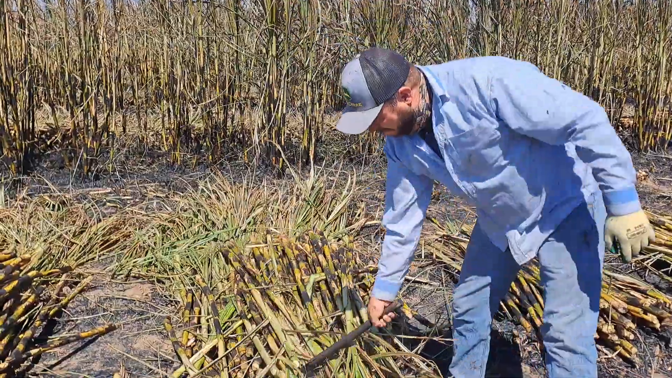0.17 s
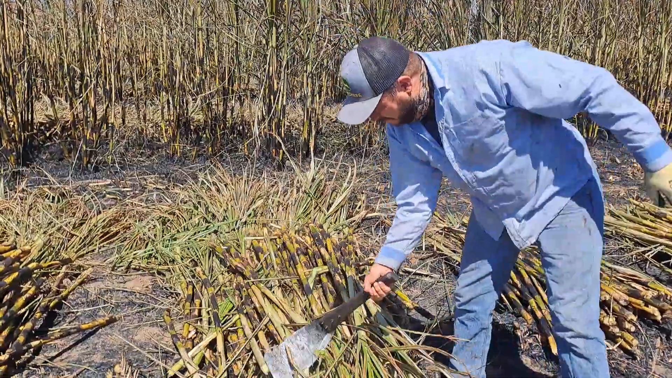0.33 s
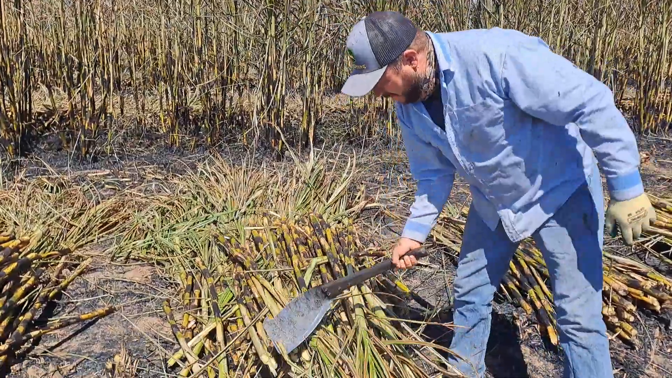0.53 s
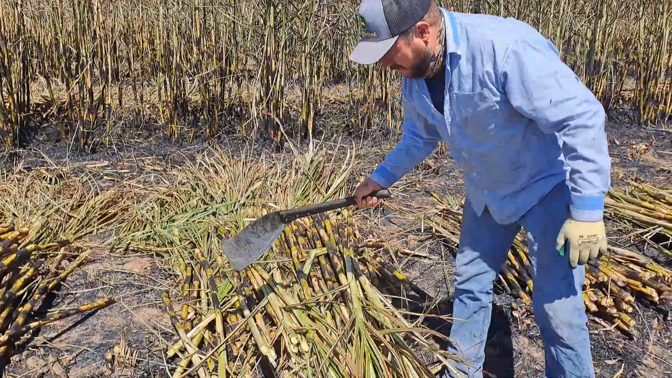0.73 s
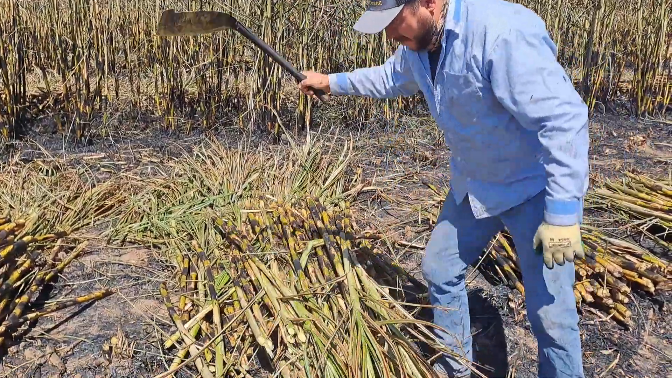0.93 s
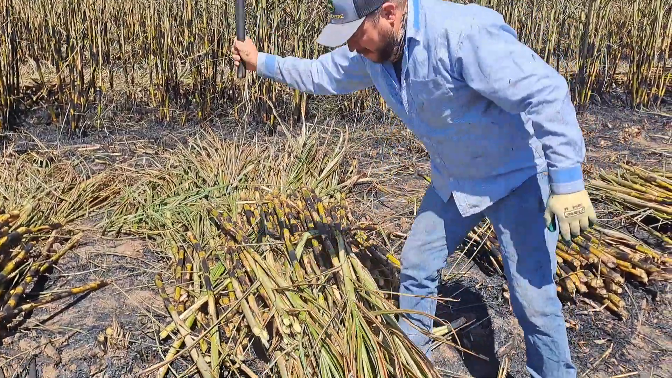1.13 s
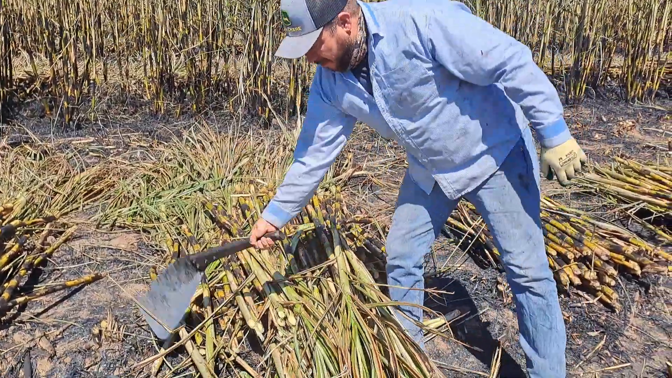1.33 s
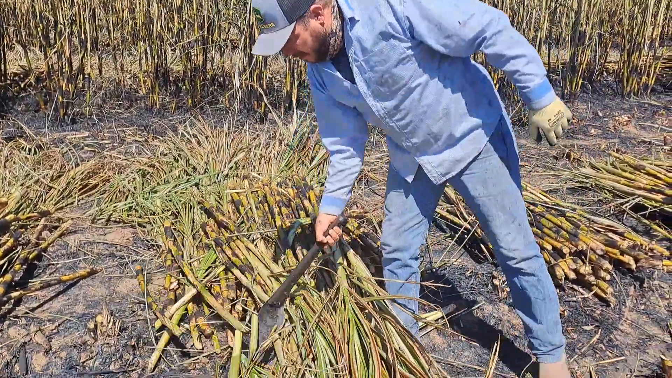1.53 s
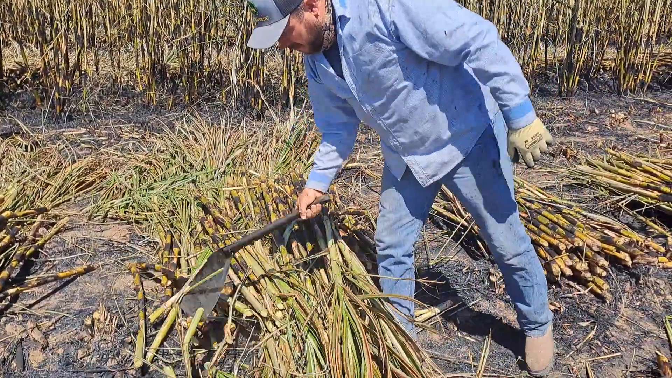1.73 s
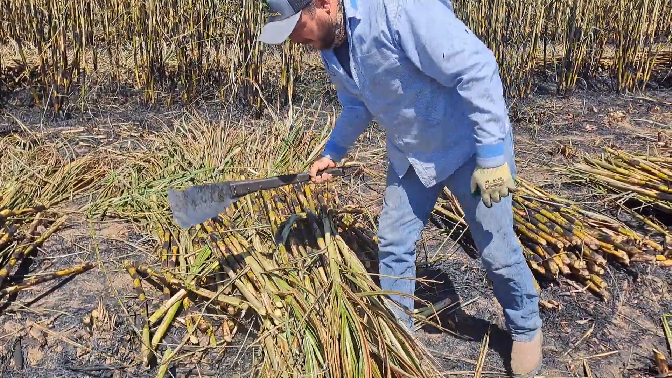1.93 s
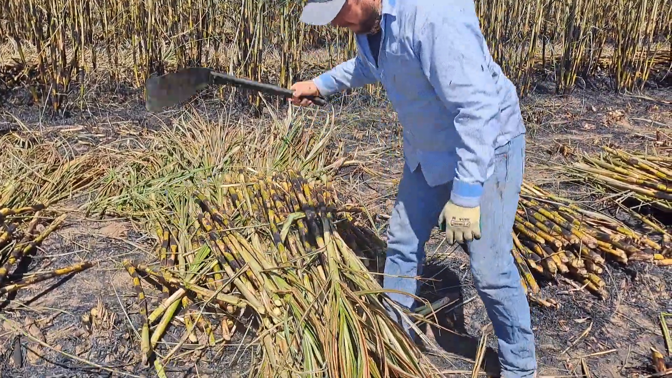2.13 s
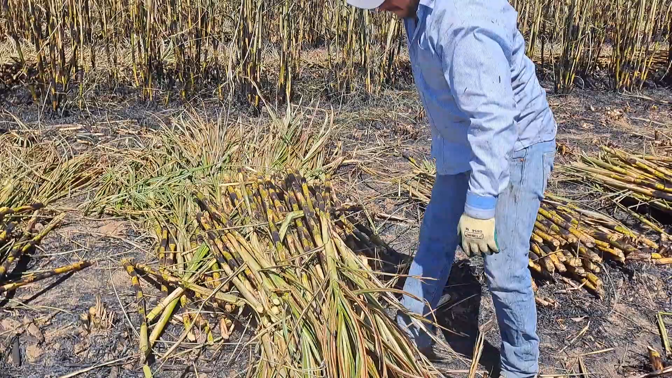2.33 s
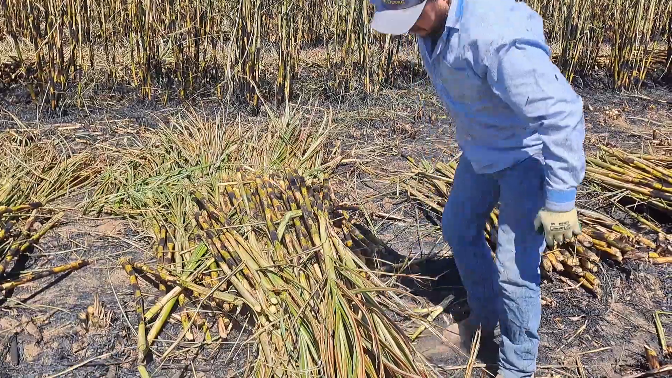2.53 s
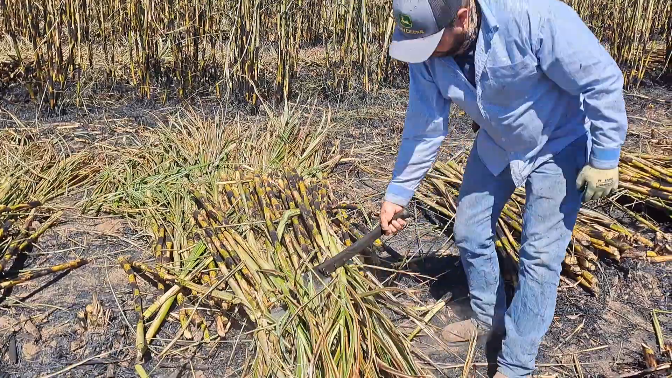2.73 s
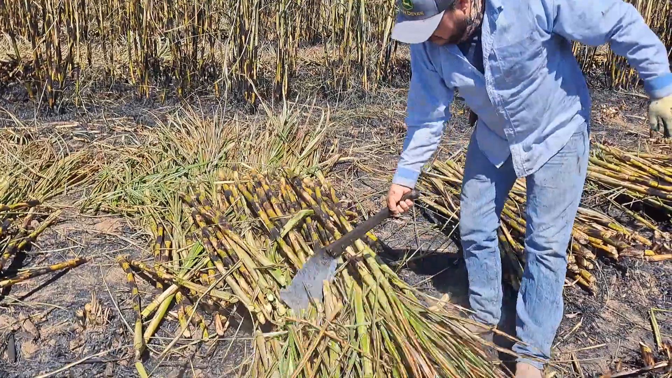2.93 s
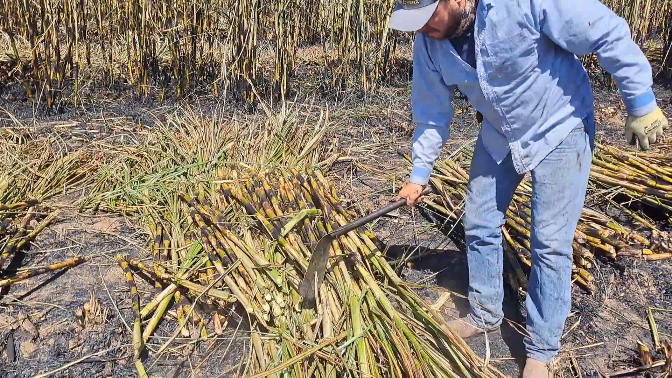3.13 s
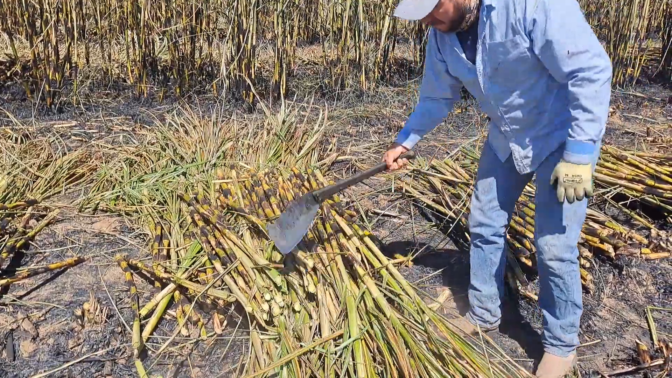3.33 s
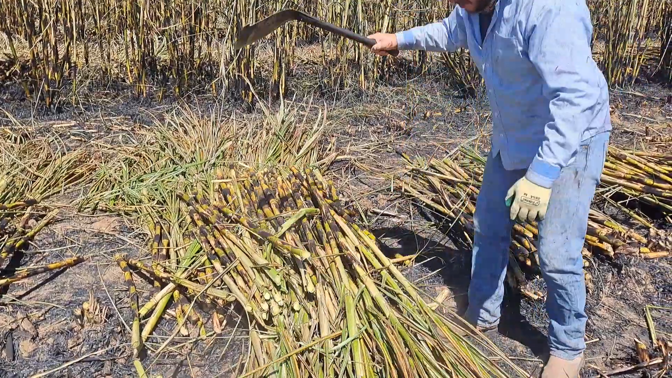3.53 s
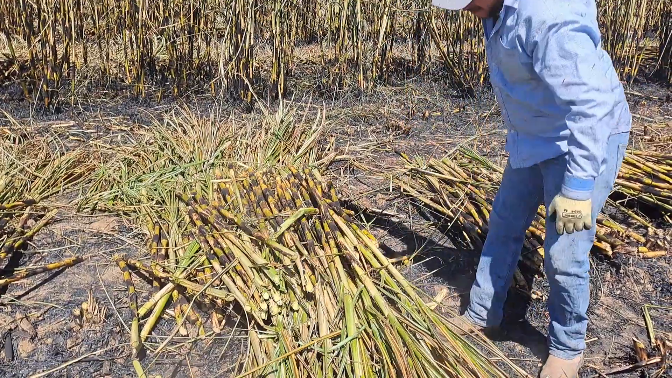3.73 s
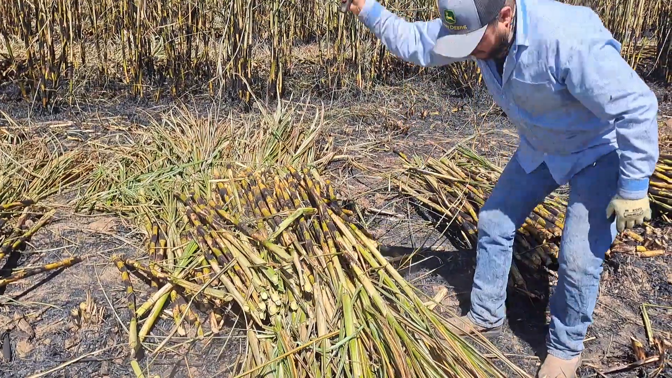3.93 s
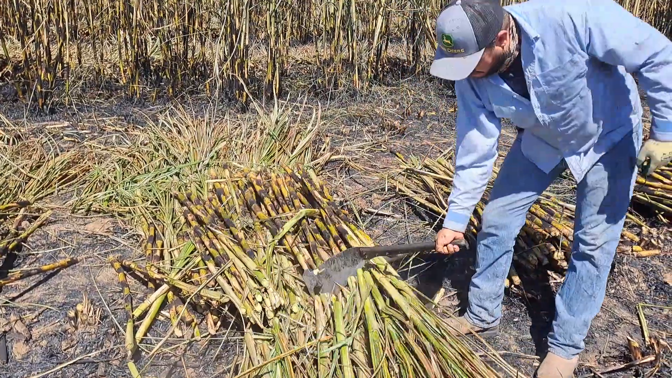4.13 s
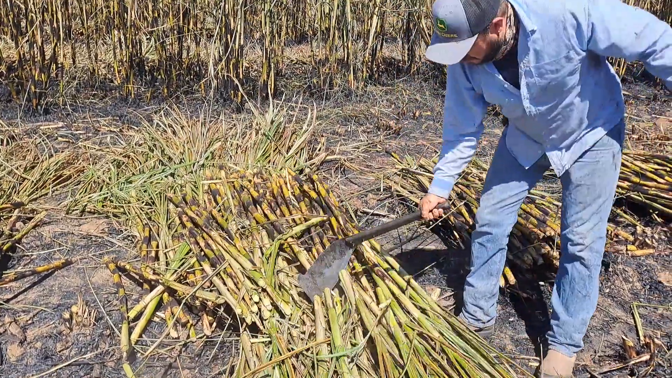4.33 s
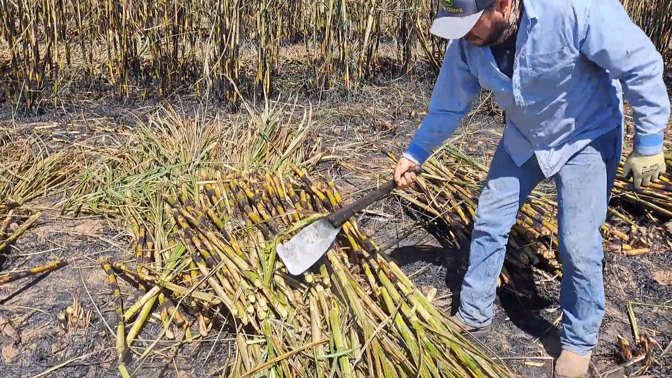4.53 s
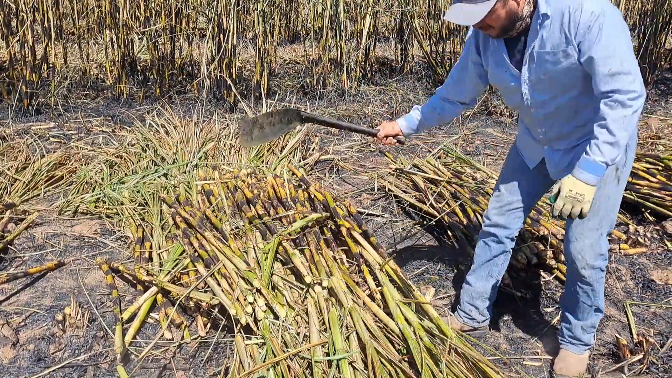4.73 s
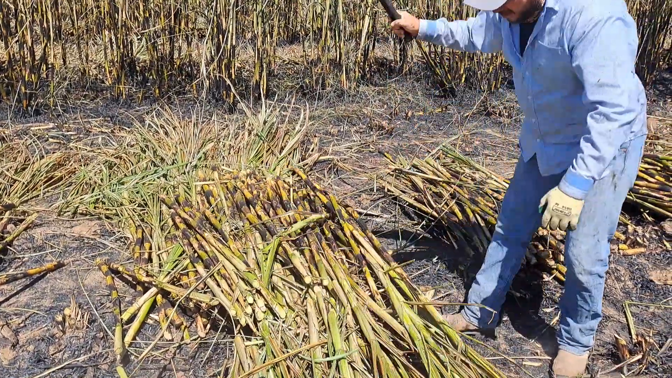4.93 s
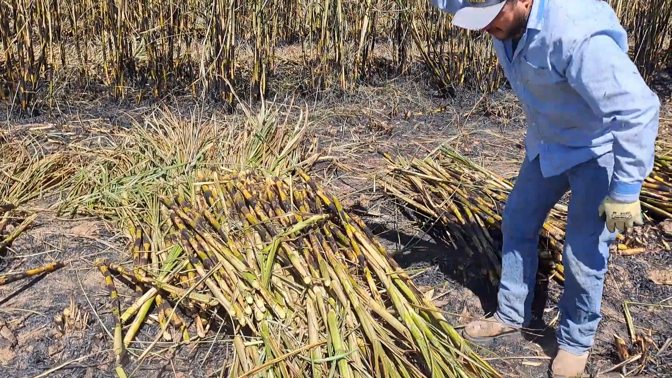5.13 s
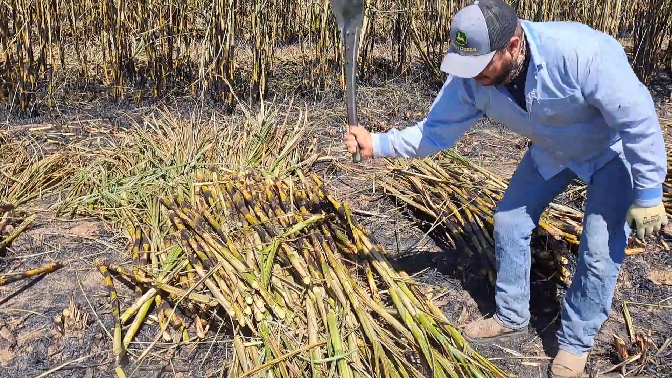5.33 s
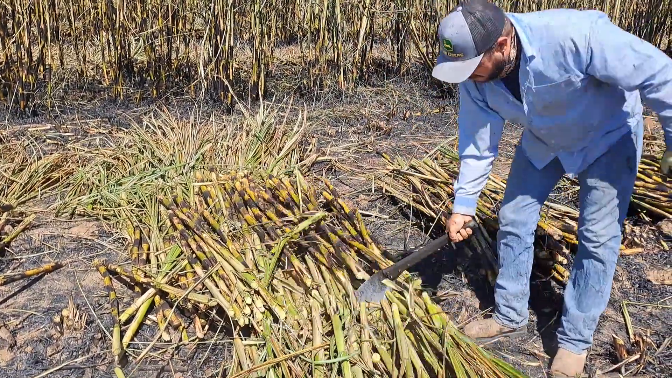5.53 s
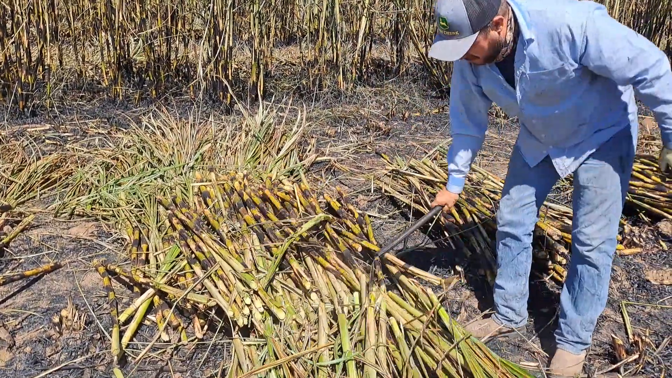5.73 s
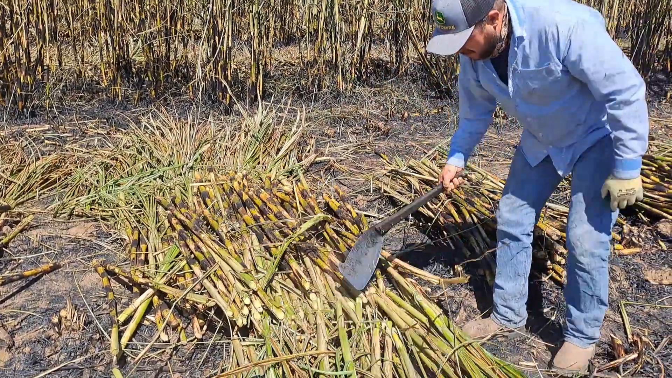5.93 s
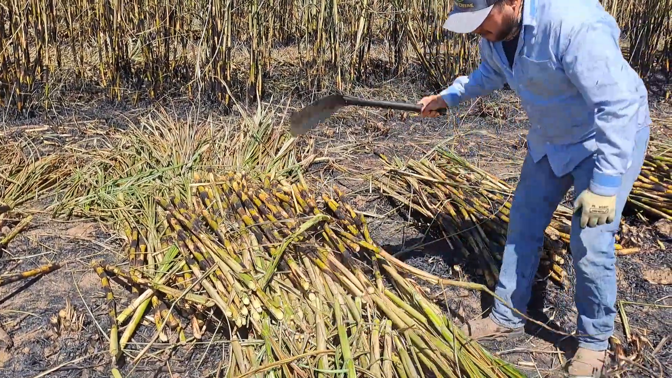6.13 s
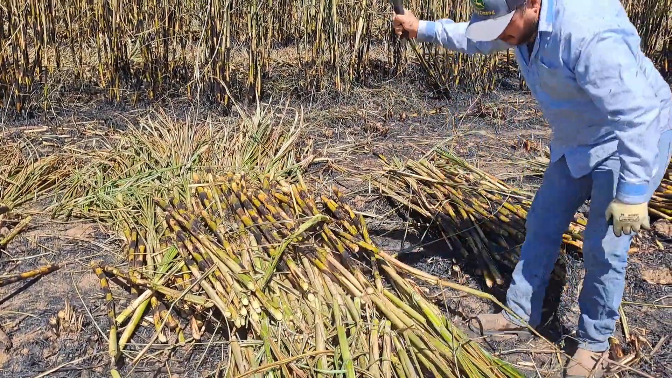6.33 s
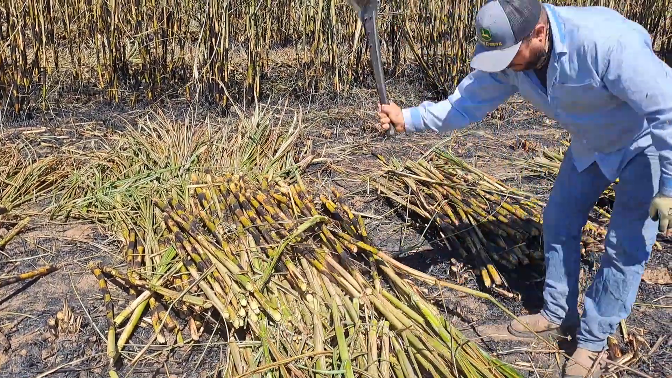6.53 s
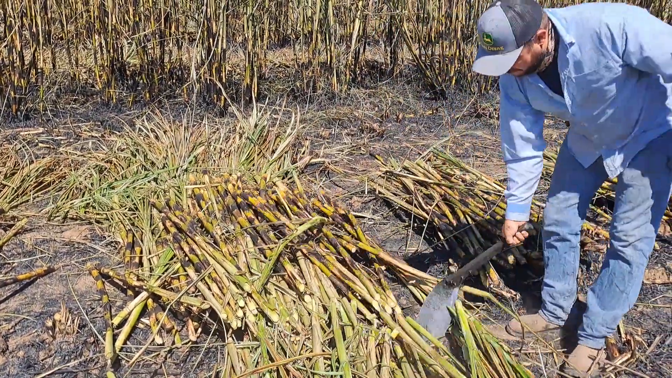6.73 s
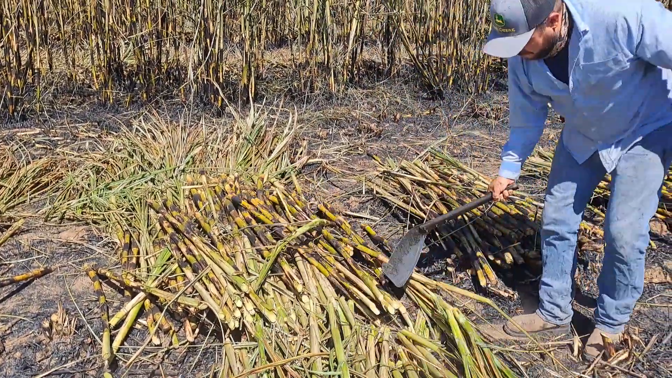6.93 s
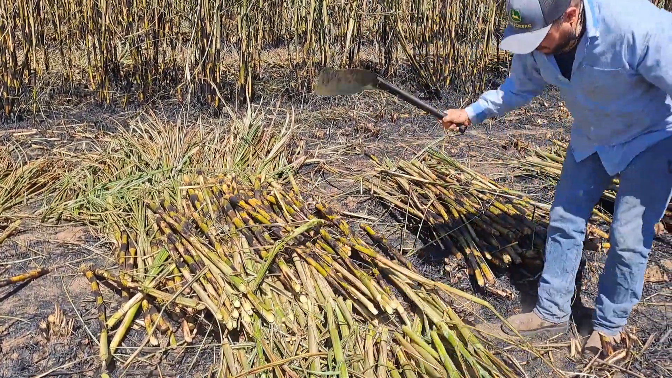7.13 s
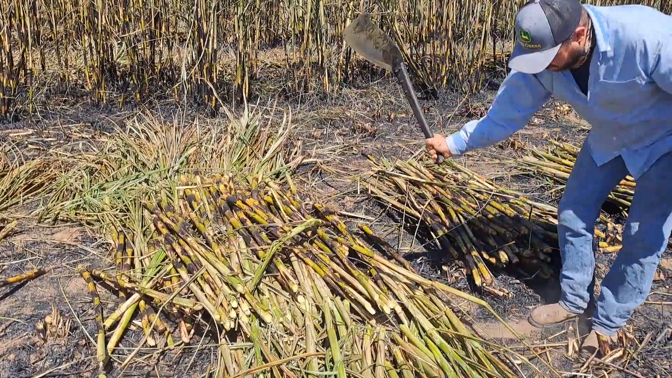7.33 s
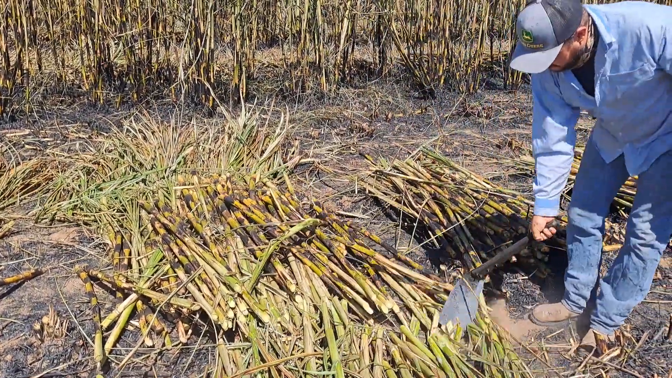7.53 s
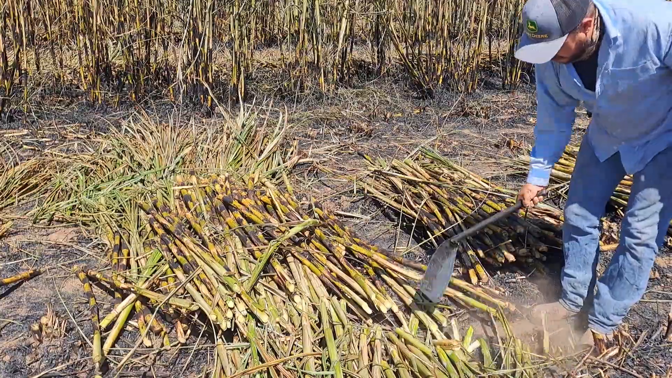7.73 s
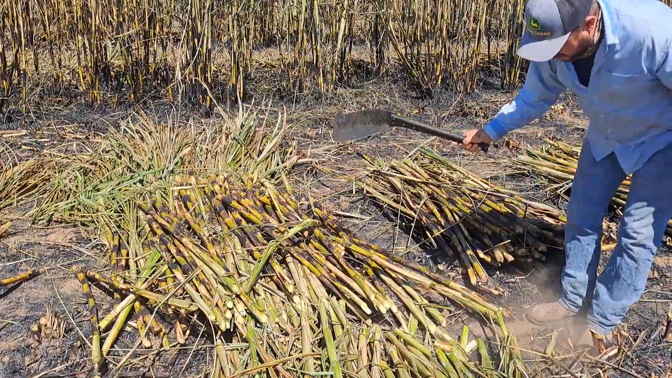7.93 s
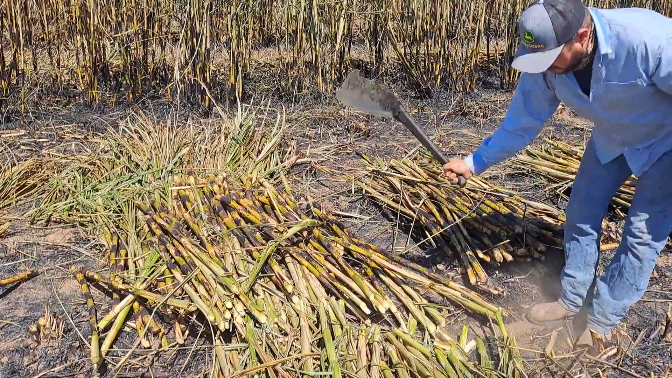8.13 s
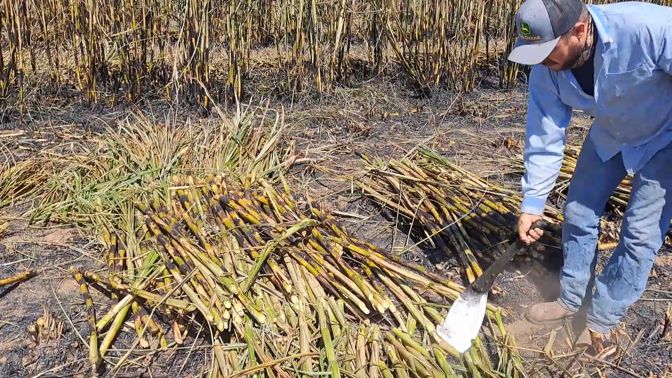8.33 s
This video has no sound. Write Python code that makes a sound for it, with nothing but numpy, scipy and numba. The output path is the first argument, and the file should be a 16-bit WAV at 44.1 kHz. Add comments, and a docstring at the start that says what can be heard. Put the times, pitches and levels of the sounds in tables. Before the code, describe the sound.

A heavy blade chops piled sugarcane in seven crunchy strokes, each followed by dry leafy rustling, over a faint distant engine drone and later wind buffeting.

```python
"""A far engine drones under a field's hiss (coloured noise); leaves brush and boots scuff stubble (random clicks).
From 0.18 s a heavy knife chops piled sugarcane in seven strokes: a rush of air, a burst of snapping fibres,
a ringing knock and a thud. After each, a hiss with tiny rings is the pile rustling and settling; stalks snap
and soft thumps land on soil between strokes. At 3.9 s the blade sings faintly as three fading sines.
From 4.7 s deep noise and single low thumps are wind buffeting the microphone."""
import sys
import numpy as np
from scipy import signal
from scipy.fft import rfft, irfft
from scipy.io import wavfile
from scipy.ndimage import uniform_filter1d
from numba import njit

SR = 44100
rng = np.random.default_rng(int(sys.argv[2]) if len(sys.argv) > 2 else 0)


def transcribe(u):
    """Save the signal u as a 16-bit wav file named by the first command-line argument.

    u: samples, shape (n,) or (channels, n), limited to [-1, 1]; the rate is SR.
    q: integer samples, one column per channel.
    """
    v = np.clip(np.atleast_2d(u).T, -1, 1)
    q = np.round(v * 32767).astype(np.int16)
    wavfile.write(sys.argv[1], SR, q)


N = 369116
TIME = np.arange(N) / SR
HIT_SIZE = 16384  # samples set aside for one short sound


def undb(db):
    """Turn decibels into gain."""
    return 10 ** (np.asarray(db) / 20)


def unit(x):
    """Scale to an average (rms) strength of 1."""
    return x / np.sqrt(np.mean(x ** 2) + 1e-18)


def colour(x, points, size=4096):
    """Shape the spectrum through (frequency [Hz], level [dB]) points, without sounding ahead of time."""
    hz, db = np.transpose(points)
    log_hz = np.log(np.fft.rfftfreq(size, 1 / SR) + 1)
    log_gain = np.log(undb(np.interp(log_hz, np.log(hz), db)))
    # folding the cepstrum forward makes the filter minimum phase
    cepstrum = irfft(log_gain)
    cepstrum[1:size // 2] *= 2
    cepstrum[size // 2 + 1:] = 0
    response = irfft(np.exp(rfft(cepstrum)))
    return signal.fftconvolve(x, response[None], axes=1)[:, :x.shape[1]]


def resonate(x, hz, width_hz):
    """Ring at one pitch: a two-pole resonance with gain 1 at its centre."""
    b, a = signal.iirpeak(hz, hz / width_hz, fs=SR)
    return signal.lfilter(b, a, x)


def walk(rate):
    """Drift smoothly between random values, with a spread a little below 1."""
    hold = int(SR / rate)
    steps = np.repeat(rng.standard_normal(N // hold + 1), hold)
    return uniform_filter1d(steps, hold)[:N]


def clicks(rate, scatter_db, lag_ms, spread_ms, size=N):
    """Random clicks of uneven strength; each has its own direction, so its own lag at the left port."""
    chance = np.clip(rate / SR, 1e-4, 1)
    right = (rng.random(size) < chance) / np.sqrt(chance) * rng.choice([-1, 1], size)
    right = right * undb(scatter_db * np.clip(rng.standard_normal(size), -3, 3))
    lag = np.rint((lag_ms + spread_ms * rng.standard_normal(size)) * SR / 1000).astype(int)
    left = np.bincount((np.arange(size) + lag) % size, right, size)
    return unit(np.array([left, right]))


def burst(length, rate, scatter_db, tail_db, tail_s, lag_ms=0., spread_ms=0.097, entry=1):
    """Clicks that swell and stop within a contact, over a tail that builds up and trails off."""
    age = TIME[:HIT_SIZE]
    progress = np.minimum(age / length, 1)
    contact = (4 * progress * (1 - progress)) ** np.clip(entry, .05, 2)
    tail = undb(tail_db) * progress * np.exp(-age / tail_s)
    return clicks(rate, scatter_db, lag_ms, spread_ms, size=HIT_SIZE) * (contact + tail)


def add(out, s, sound, db, length):
    """Mix in a sound at time s with the energy of level db held for the given length."""
    start = max(int(s * SR), 0)
    gain = undb(db) * np.sqrt(length * SR / HIT_SIZE)
    part = (unit(sound) * gain)[:, :N - start]
    out[:, start:start + part.shape[1]] += part


@njit
def ring(start, lag, hz, decay, size):
    """Sum of short damped sines; each reaches the left port lag samples after the right."""
    out = np.zeros((2, N))
    for k in range(len(start)):
        pole = np.exp(2j * np.pi * hz[k] / SR - 1 / (decay[k] * SR))
        z = size[k] / np.sqrt(decay[k]) + 0j
        for i in range(start[k], min(start[k] + int(6 * decay[k] * SR), N)):
            z *= pole  # one sample of turning and fading
            out[1, i] += z.imag
            if 0 <= i + lag[k] < N:
                out[0, i + lag[k]] += z.imag
    return out


def grains(rate, low_hz, high_hz, typical_ring_s, scatter_db, lag_ms, spread_ms):
    """Small pieces flick at random, each with its own pitch, ring, strength and direction."""
    chance = np.clip(rate / SR, 1e-4, 1)
    start = np.flatnonzero(rng.random(N) < chance)
    strength, damping, direction = rng.standard_normal((N, 3))[start].T
    pitch, sign = rng.random((N, 2))[start].T
    hz = low_hz + (high_hz - low_hz) * pitch
    lag = np.rint((lag_ms + spread_ms * direction) * SR / 1000).astype(np.int64)
    size = np.sign(sign - .5) * undb(scatter_db * np.clip(strength, -3, 3))
    decay = typical_ring_s * np.exp(.5 * np.clip(damping, -2, 2))
    return ring(start, lag, hz, decay, size)


# far engine and standing cane, relative spectrum: (frequency [Hz], level [dB])
FIELD_SPECTRUM = [(20, -13.5), (42, 2), (62, 15), (85, 3), (130, -8), (250, -9.5), (500, -33), (900, -12),
                  (1950, -15.5), (2300, -6), (2600, -18.5), (3200, -21.5), (6000, -19.5), (16000, -27)]


def field():
    """A far engine drones as a low band of noise under the hiss of the standing cane."""
    air = colour(clicks(46000, scatter_db=-2.0, lag_ms=0., spread_ms=0.39), FIELD_SPECTRUM)
    return unit(air) * undb(-56 + .5 * walk(9))


def flutter(x, depth_db=1.0, rate=38):
    """Patches of leaves slip on their own, so each of four pitch bands flickers separately."""
    out, rest = 0, x
    for hz in (2500, 5000, 9000):
        lowpass = signal.butter(2, hz, fs=SR, output="sos")
        low = signal.sosfiltfilt(lowpass, rest)
        out = out + low * undb(depth_db * walk(rate))
        rest = rest - low
    return out + rest * undb(depth_db * walk(rate))


# Leaf and stalk levels below are before their trims and flicker.
# the shaken pile after each stroke: (time [s], first shake level [dB], sliding level [dB], sliding fade [dB/s],
# time until the blade is lifted clear [s], stalks against leaves [dB])
PILE_SHAKES = [(0.189, -23.5, -21, 49, 0.55, -10), (1.43, -43, -24, 27, 0.48, -10.5),
               (2.801, -17.5, -25, 26.5, 0.69, -11.5), (4.137, -21.5, -27.5, 13.5, 0.79, -12),
               (5.477, -20, -26, 14.5, 0.47, -11.5), (6.71, -25, -25, 33.5, 0.71, -11),
               (7.523, -42, -29.5, 46.5, 0.51, -7.5)]
# leaves brushed between strokes: (time of peak [s], level [dB], swell [s], fade [s])
LEAF_BRUSHES = [(0.03, -52.5, 0.11, 0.056), (1.1, -49, 0.054, 0.098), (1.3, -49, 0.078, 0.14),
                (1.7, -34.5, 0.012, 0.017), (1.84, -34.5, 0.039, 0.048), (2.118, -50, 0.0055, 0.016),
                (2.205, -54, 0.008, .02), (2.34, -48.5, 0.03, 0.094), (2.5, -46.5, 0.049, 0.085),
                (2.668, -53, 0.017, .04), (3.25, -38, 0.034, 0.06), (3.43, -44, 0.029, 0.062),
                (3.86, -53, .015, 0.024), (4.565, -40, 0.023, 0.011), (4.75, -33.5, 0.014, 0.066),
                (5.4, -41.5, 0.19, 0.24), (6.63, -52, 0.093, 0.068), (7.31, -42, 0.039, 0.081),
                (8.217, -44.5, 0.0087, 0.038)]
# stalks stirred between strokes, some by shifting feet: (time of peak [s], level [dB], half length [s])
STALK_STIRS = [(0.787, -53.5, 0.046), (2.516, -50, 0.063), (4.784, -53, 0.044), (5.08, -48, 0.079),
               (6.44, -52, 0.069)]
# as the worker moves right, the ports hear the leaves duller: (time [s], share of later colour [0-1])
LATER_SHARE = [(0, 0.4), (1.6, 0.54), (2.9, 0.66), (4.2, 0.7), (7.6, 0.88)]
# leaves early on, leaves later on and stalks, relative spectra: (frequency [Hz], level [dB])
EARLY_LEAF_SPECTRUM = [(80, -25.5), (600, -28.5), (1200, 1), (2000, 1), (3000, 2), (4500, 3), (8500, -4),
                       (10500, 3), (12500, 2.5), (16000, 3.5)]
LATER_LEAF_SPECTRUM = [(80, -22), (600, -20.5), (1200, -12.5), (2000, -1), (3000, -2), (4500, 0.5),
                       (8500, -0.5), (10500, -4), (12500, -9.5), (16000, 2.5)]
STALK_SPECTRUM = [(50, -7), (180, -3.5), (300, -0.5), (480, -7), (800, 1.5), (1500, 3.5), (2300, 4),
                  (4000, -4.5), (10000, -8)]
RUSTLE_ATTACK_S = 0.018
SHAKE_DB_PER_S, SETTLE_DB_PER_S = 112.5, 45  # the first shake dies fast; lifting the blade adds to the fade
JOLT_DB, JOLT_DB_PER_S = -28.5, 188  # stalks jolted by the blow itself
BRUSH_STALK_DB = -9.5  # stalks against leaves when only brushed
FLICK_DB, TICK_RATE, TICK_DB = -7.0, 160, -12  # ticks per second; levels against the sliding hiss
CATCH_DB, CATCH_RATE = 1.0, 70  # leaves catch and let go in clusters: drift scale, changes per second


def leaves():
    """A stroke shakes the pile; leaves slide, then settle, over the duller clatter of stalks."""
    leaf_power, stalk_power = np.zeros(N), np.zeros(N)
    for s, shake_db, slide_db, fade, lifted_s, stalk_db in PILE_SHAKES:
        age = np.maximum(TIME - s, 0)
        attack = np.minimum(age / RUSTLE_ATTACK_S, 1)
        shake = undb(shake_db - SHAKE_DB_PER_S * age)
        slide = undb(slide_db - fade * age - SETTLE_DB_PER_S * np.maximum(age - lifted_s, 0))
        jolt = undb(JOLT_DB - JOLT_DB_PER_S * age)
        stirred = attack * (shake ** 2 + slide ** 2)
        leaf_power += stirred
        stalk_power += stirred * undb(stalk_db) ** 2 + attack * jolt ** 2
    for s, db, swell_s, fade_s in LEAF_BRUSHES:
        side_s = np.where(TIME < s, swell_s, fade_s)
        stirred = undb(db) ** 2 * np.exp(-((TIME - s) / side_s) ** 2)
        leaf_power += stirred
        stalk_power += stirred * undb(BRUSH_STALK_DB) ** 2
    for s, db, half_s in STALK_STIRS:
        stalk_power += undb(db) ** 2 * np.exp(-((TIME - s) / half_s) ** 2)

    # sliding leaves make a dense hiss; edges that catch and let go ring briefly
    sliding = clicks(30000, scatter_db=0.5, lag_ms=.12, spread_ms=.14)
    flicks = grains(4200, 1200, 14000, typical_ring_s=.0007, scatter_db=3.5, lag_ms=.12, spread_ms=.14)
    ticks = grains(TICK_RATE, 1500, 12000, typical_ring_s=.0005, scatter_db=4, lag_ms=.12, spread_ms=.14)
    crackle = sliding + undb(FLICK_DB) * unit(flicks) + undb(TICK_DB) * unit(ticks)
    later = np.clip(np.interp(TIME, *np.transpose(LATER_SHARE)), 0, 1)
    early_sound = (1 - later) * colour(crackle, EARLY_LEAF_SPECTRUM)
    later_sound = later * colour(crackle, LATER_LEAF_SPECTRUM)
    rustle = unit(flutter(early_sound + later_sound))
    knocks = grains(4500, 150, 4000, typical_ring_s=.0016, scatter_db=2, lag_ms=.1, spread_ms=.09)
    clatter = unit(colour(knocks, STALK_SPECTRUM))

    leaf_gain = np.sqrt(leaf_power) * undb(1.39 + CATCH_DB * walk(CATCH_RATE))
    stalk_gain = np.sqrt(stalk_power) * undb(-0.24 + 1.4 * walk(44))
    return rustle * leaf_gain + clatter * stalk_gain


# boots dragging over stubble: (time [s], level [dB], length [s])
BOOT_SCUFFS = [(0.049, -48, 0.016), (1.058, -48, 0.12), (1.274, -55, 0.085), (2.323, -48, 0.036),
               (2.469, -46.5, 0.07), (2.634, -51, .005), (5.008, -51, 0.096), (6.371, -53.5, 0.13),
               (8.202, -44.5, 0.027)]
# dry stubble, relative spectrum: (frequency [Hz], level [dB])
STUBBLE_SPECTRUM = [(100, -24), (700, -3.5), (1500, 0), (2600, -3), (4500, -10), (8000, -8), (16000, -25)]


def scuffs():
    """Boot soles grind dry stubble as the feet shift, in bursts of uneven clicks."""
    out = np.zeros((2, N))
    for s, db, length in BOOT_SCUFFS:
        grit = burst(length, rate=1700, scatter_db=6.0, tail_db=0.0, tail_s=0.053, lag_ms=0.074, spread_ms=0.028)
        add(out, s, colour(grit, STUBBLE_SPECTRUM), db, length)
    return out


# air round the falling blade: level against its swell, swell time, centre pitch
WHOOSH_DB, WHOOSH_S, WHOOSH_HZ = -48.5, 0.031, 1300


def whooshes():
    """The blade rushes through the air, louder as it falls, until it meets the cane."""
    speed = sum(np.exp(-np.abs(TIME - s) / WHOOSH_S) * (TIME < s) for s, *_ in PILE_SHAKES)
    air = resonate(clicks(30000, scatter_db=-1.5, lag_ms=0., spread_ms=.06), WHOOSH_HZ, width_hz=990)
    return unit(air) * speed * undb(WHOOSH_DB)


# loose soil under the pile, relative spectrum: (frequency [Hz], level [dB])
SOIL_SPECTRUM = [(30, -23), (80, -4.5), (160, -4), (260, -2), (370, -4), (500, -23), (1500, -11),
                 (8000, -49.5)]


def thud(push):
    """A pile of stalks on loose soil gives a short thud without deep bass."""
    no_deep_bass = signal.butter(3, 88, "high", fs=SR, output="sos")
    return signal.sosfilt(no_deep_bass, colour(push, SOIL_SPECTRUM))


# blade through stalks: (time [s], length [s], entry [0 abrupt - 1 gradual], crack level [dB], split pitch [Hz],
# split level [dB], knock delay [s], knock pitch [Hz], knock level [dB], thud level [dB])
BLADE_CUTS = [(0.177, 0.015, 1, -15, 1490, -22, 0.00097, 770, -31.5, -32),
              (1.414, 0.0077, 0.54, -14.5, 1740, -25.5, 0.011, 920, -36, -28),
              (1.421, 0.0076, 0.53, -22.5, 1940, -24, 0.012, 810, -33, -27.5),
              (1.432, 0.0038, 0.52, -40, 1320, -25, 0.034, 955, -32, -49),
              (2.7855, 0.012, 1, -14.5, 1570, -19, 0.011, 816, -22, -31),
              (4.118, .013, 0.12, -19.5, 1680, -23.5, 0.0078, 774, -22.5, -34.5),
              (5.458, 0.016, 0.17, -18, 1530, -18, 0.0092, 810, -25, -31.5),
              (6.6834, 0.013, 0.42, -14, 2400, -23.5, 0, 784, -35, -43),
              (6.702, 0.013, 0.47, -19.5, 1930, -25.5, 0.0048, 920, -27.5, -40),
              (7.5096, 0.012, 0.39, -17.5, 2050, -23, 0.004, 870, -28, -30),
              (7.551, 0.0081, .6, -41, 1300, -46, 0.0035, 577, -43, -46)]
# snapping fibres, relative spectrum: (frequency [Hz], level [dB])
FIBRE_SPECTRUM = [(40, -23.5), (130, -15.5), (260, -7), (500, -10.5), (1200, -1.5), (2000, -1), (3200, -4),
                  (5500, -5.5), (8000, -7.5), (16000, -9)]


def chops():
    """Fibres snap as the edge passes, the rind splits, the stalk knocks on others, the pile thuds on soil."""
    out = np.zeros((2, N))
    for (s, length, entry, crack_db, split_hz, split_db,
         delay, knock_hz, knock_db, thud_db) in BLADE_CUTS:
        fibres = burst(length, rate=5000, scatter_db=-2.5, tail_db=6.0, tail_s=0.02,
                       lag_ms=-0.051, spread_ms=0.039, entry=entry)
        add(out, s, colour(fibres, FIBRE_SPECTRUM), crack_db, length)

        rind = burst(length, rate=2600, scatter_db=6.5, tail_db=-25.0, tail_s=0.012, spread_ms=.03, entry=entry)
        add(out, s, resonate(rind, split_hz, width_hz=820), split_db, length)

        blow = burst(.003, rate=6000, scatter_db=3, tail_db=-24, tail_s=.012, lag_ms=.04, spread_ms=.02)
        knock = resonate(resonate(blow, knock_hz, width_hz=600), knock_hz, width_hz=120)
        add(out, s + delay, knock, knock_db, length)

        push = burst(length, rate=2900, scatter_db=7.0, tail_db=-18.5, tail_s=0.062)
        add(out, s, thud(push), thud_db, length)
    return out


# single stalks and leaves snapping: (time [s], level [dB], centre pitch [Hz], length [s])
SINGLE_SNAPS = [(0.302, -35, 1700, 0.0057), (0.506, -32.5, 2640, 0.004), (0.669, -51, 1000, 0.017),
                (1.533, -32, 1500, .012), (1.676, -32, 9700, 0.0096), (1.7, -35.5, 1620, 0.0089),
                (1.703, -25.5, 8900, 0.004), (1.848, -37, 2000, 0.015), (2.112, -47, 1530, 0.013),
                (2.307, -48.5, 4500, 0.0041), (2.638, -48, 5540, 0.0055), (2.667, -44.5, 1000, 0.0063),
                (3.835, -47.5, 3550, 0.013), (4.242, -30.5, 1210, 0.0054), (4.553, -31, 1870, 0.017),
                (4.734, -34, 2670, 0.012), (4.912, -38, 9250, 0.0066), (5.131, -43, 2440, 0.01),
                (5.181, -41.5, 7000, 0.012), (5.971, -33, 2200, 0.0046), (6.051, -42, 2600, .005),
                (6.292, -53, 9000, .015), (7.251, -33.5, 10200, 0.0045), (7.299, -41.5, 1900, 0.027),
                (7.884, -42, 2400, 0.0035), (7.915, -45.5, 1400, 0.011), (8.351, -35, 1650, 0.065)]


def snaps():
    """Single stalks crack and leaves flick as the pile shifts: short resonant click bursts."""
    out = np.zeros((2, N))
    for s, db, hz, length in SINGLE_SNAPS:
        fibres = burst(length, rate=6000, scatter_db=2, tail_db=-14, tail_s=.012, lag_ms=.1, entry=.5)
        add(out, s, resonate(fibres, hz, width_hz=300 + .25 * hz), db, length)
    return out


# boots and cut tops landing on soil: (time [s], level [dB], length [s])
SOIL_THUMPS = [(0.402, -42, 0.0044), (0.819, -50, 0.0045), (1.07, -59, 0.13), (1.837, -68, 0.028),
               (2.199, -48, 0.01), (2.331, -51, 0.023), (2.394, -50, 0.036), (2.478, -55.5, 0.14),
               (2.667, -46.5, 0.0093), (3.318, -53, 0.033), (8.204, -52, 0.018)]


def thumps():
    """Soft weight crushes stubble into the soil."""
    out = np.zeros((2, N))
    for s, db, length in SOIL_THUMPS:
        push = burst(length, rate=2700, scatter_db=4.5, tail_db=-1.0, tail_s=0.03)
        add(out, s, thud(push), db, length)
    return out


# blade ringing in the air, before the left-right balance: (frequency [Hz], level [dB])
BLADE_TONES = [(2078, -75), (4027, -68), (5782, -82)]
BLADE_T60_S = 1.1  # time to fade by 60 dB


def blade(start_s=3.9):
    """The steel sings faintly while it is lifted: a few sines that swell and die away."""
    age = np.maximum(TIME - start_s, 0)
    tones = sum(undb(db) * np.sin(2 * np.pi * hz * age) for hz, db in BLADE_TONES)
    swell = np.minimum(age / 0.071, 1)
    fade = np.exp(-np.log(1000) * age / BLADE_T60_S)
    balance = undb([[-3], [4]])  # left, right
    return tones * swell * fade * balance


def pan(db):
    """Left and right gains of constant power, db apart."""
    gains = undb(db * np.array([[.5], [-.5]]))
    return gains / np.hypot(*gains)


# the breeze rises and falls, leaning mostly to the right port by changing amounts,
# before a 3 dB cut and the gusts: (time [s], level [dB], left minus right [dB])
BREEZE = [(4.68, -56, 0), (4.82, -43, -18), (5.55, -40, -18), (5.95, -37.5, -10), (6.2, -31.5, -2),
          (6.42, -40, -4), (6.62, -28.5, -16), (7.05, -38.5, -4), (8.15, -45, -4.5), (8.37, -60, 4)]
# eddies hitting the ports: (time [s], level [dB], length [s], left minus right [dB])
EDDY_HITS = [(4.823, -44, 0.02, -22), (5.081, -36, 0.015, -19), (5.621, -36, 0.029, -24),
             (5.696, -30.5, 0.016, -31), (5.786, -31.5, 0.021, -28), (5.892, -27.5, 0.015, -29),
             (6.14, -41, 0.025, 10), (6.284, -28.5, 0.026, -25), (6.524, -33, 0.036, -22),
             (6.622, -28.5, 0.029, -34), (6.797, -31.5, 0.037, -18), (6.964, -22, 0.01, -15),
             (7.232, -32.5, 0.051, -18), (7.28, -30.5, 0.056, -22), (7.509, -38, 0.023, -1),
             (7.652, -39.5, 0.054, 7), (7.879, -47, 0.04, 11), (8.104, -51, 0.057, -8)]
# steady rumble and single eddies, relative spectra: (frequency [Hz], level [dB])
GUST_SPECTRUM = [(10, -48.5), (28, -12.5), (45, -1), (75, 1), (120, -8.5), (200, -24.5), (400, -32),
                 (1000, -60.5), (8000, -90)]
EDDY_SPECTRUM = [(10, -52), (30, -17.5), (60, 5.5), (130, -6), (220, -12.5), (400, -31.5), (1000, -63),
                 (8000, -69)]
GUST_DB, GUST_RATE = 3.5, 16  # drift scale, changes per second


def wind():
    """Turbulence rumbles on each port separately; single eddies thump."""
    s, db, pan_db = np.transpose(BREEZE)
    strength = undb(np.interp(TIME, s, db, left=-90) - 3.0 + GUST_DB * walk(GUST_RATE))
    rumble = unit(colour(rng.standard_normal((2, N)), GUST_SPECTRUM))
    out = rumble * strength * pan(np.interp(TIME, s, pan_db))
    for s, db, length, pan_db in EDDY_HITS:
        eddy = colour(burst(length, rate=4000, scatter_db=2, tail_db=-18, tail_s=.02), EDDY_SPECTRUM)
        add(out, s, eddy * pan(pan_db), db, length)
    return out


def scene():
    """Everything as it arrives at the two microphone ports."""
    return (field() + leaves() + scuffs() + whooshes() + chops()
            + snaps() + thumps() + blade() + wind())


# response of the two microphone ports: (frequency [Hz], left level [dB], right level [dB])
PORT_RESPONSE = [(613, 4, 3), (1140, -0.5, 0), (2080, -3, 5), (3050, -0.5, 3), (3970, -1.5, 5.5),
                 (5370, 2, 2.5), (7100, 0.5, 3.5), (7630, -1, -0.5), (9530, 3, 13), (11400, -4.5, 8),
                 (12930, -12.5, 2.5), (15270, -12, -26)]
TOP_HZ = 15900


def record(dry):
    """Each port has its own colour; any peaks beyond full scale clip and the top is cut."""
    hz, *sides = np.transpose(PORT_RESPONSE)
    wet = np.vstack([colour(x[None], np.column_stack([hz, db])) for x, db in zip(dry, sides)])
    top_cut = signal.ellip(10, .2, 70, TOP_HZ, fs=SR, output="sos")
    return signal.sosfilt(top_cut, np.clip(wet, -1, 1))


dry = scene()
out = record(dry)
transcribe(out)
```